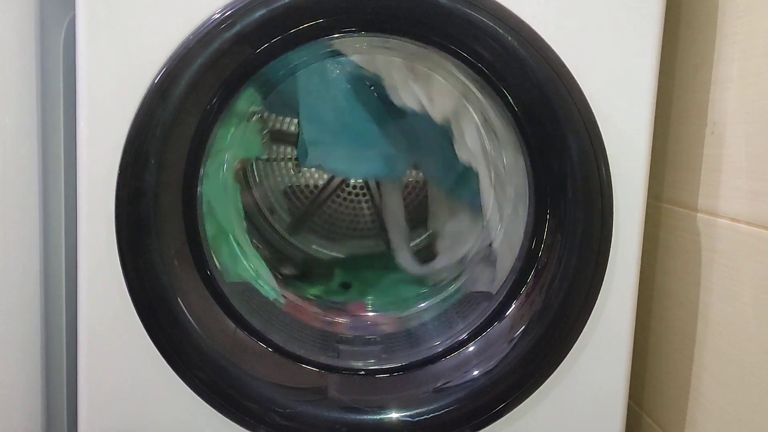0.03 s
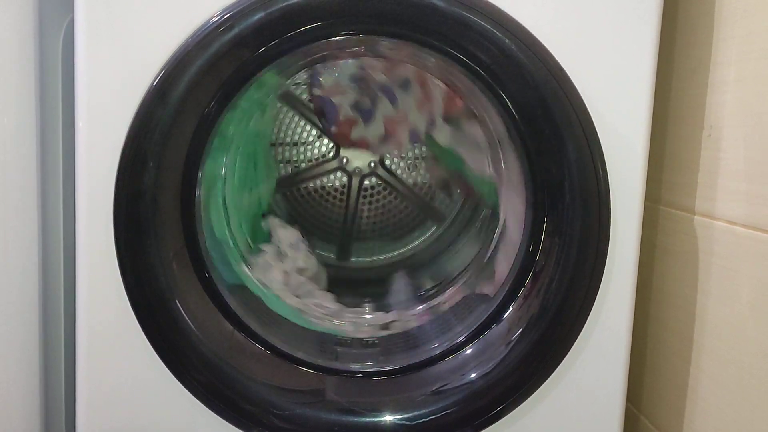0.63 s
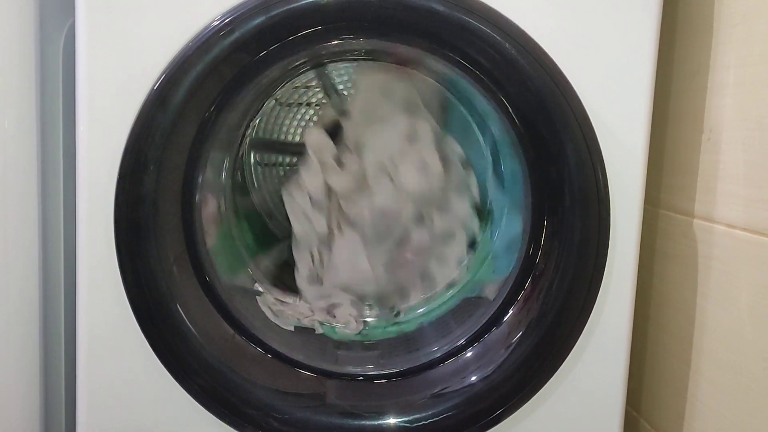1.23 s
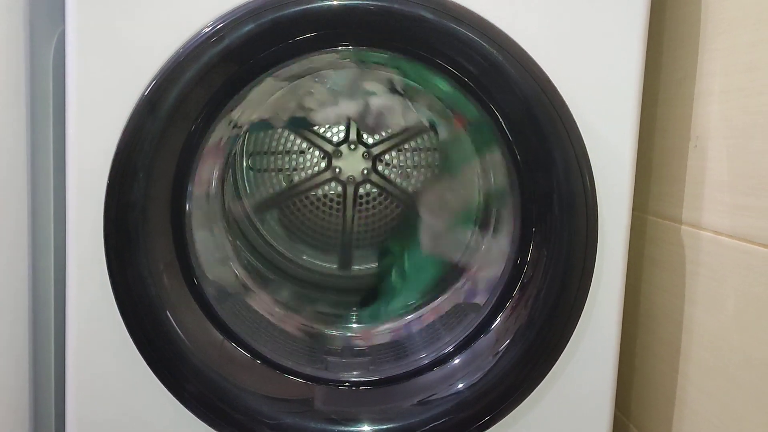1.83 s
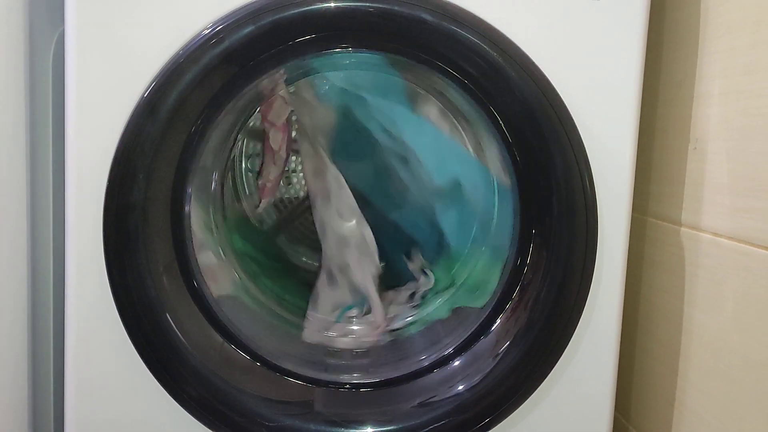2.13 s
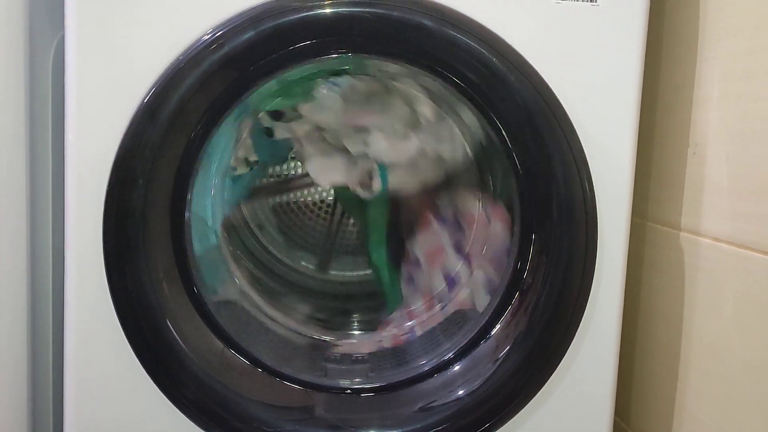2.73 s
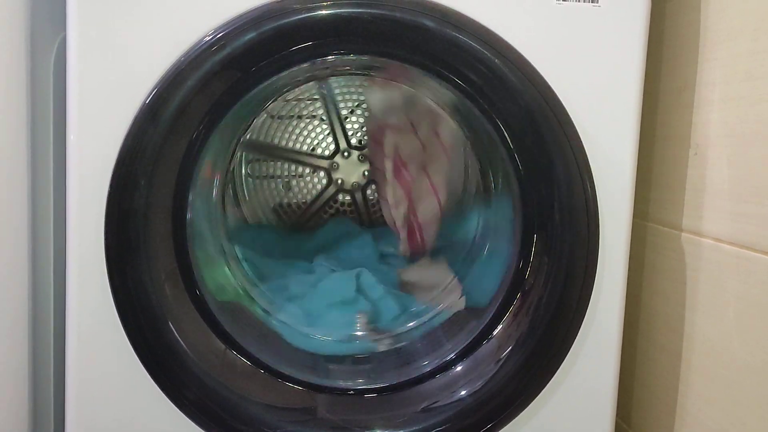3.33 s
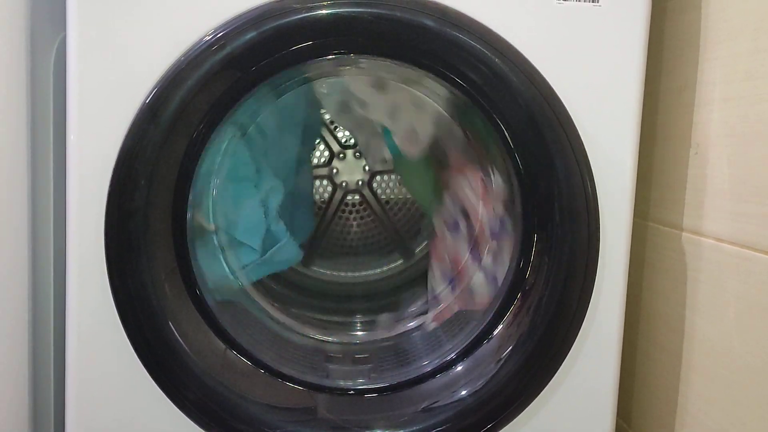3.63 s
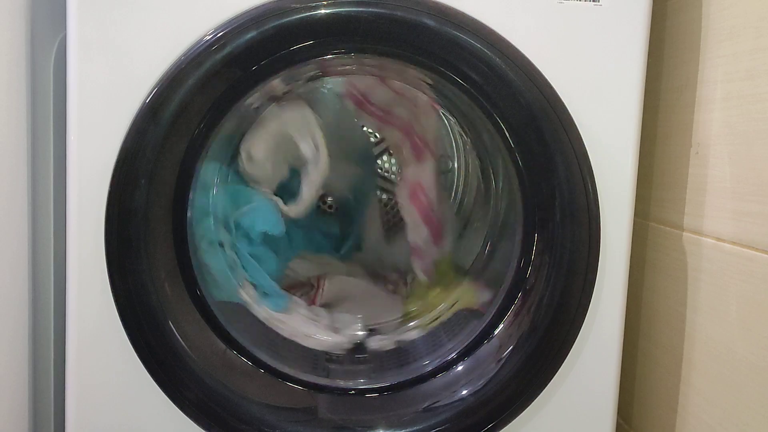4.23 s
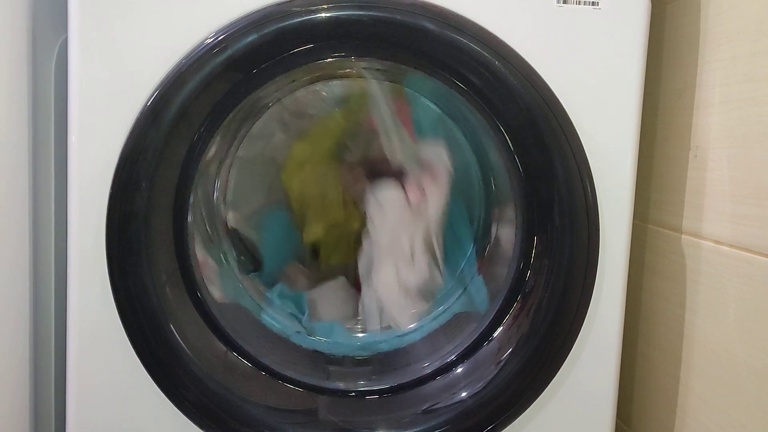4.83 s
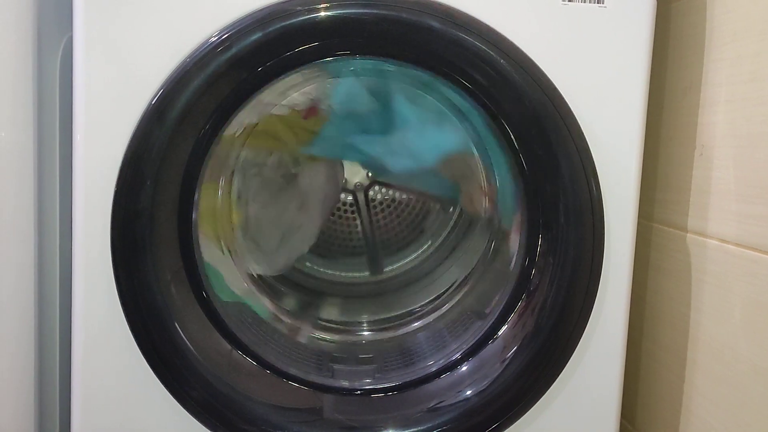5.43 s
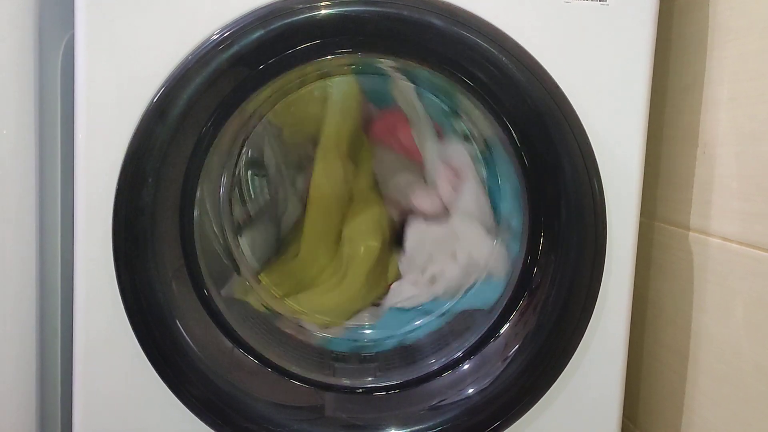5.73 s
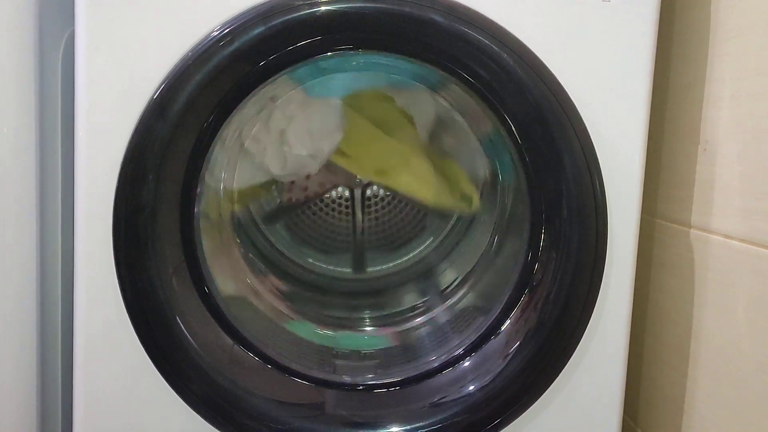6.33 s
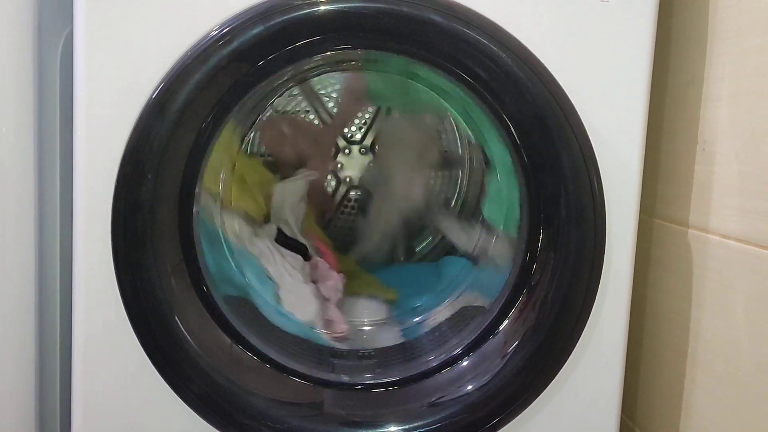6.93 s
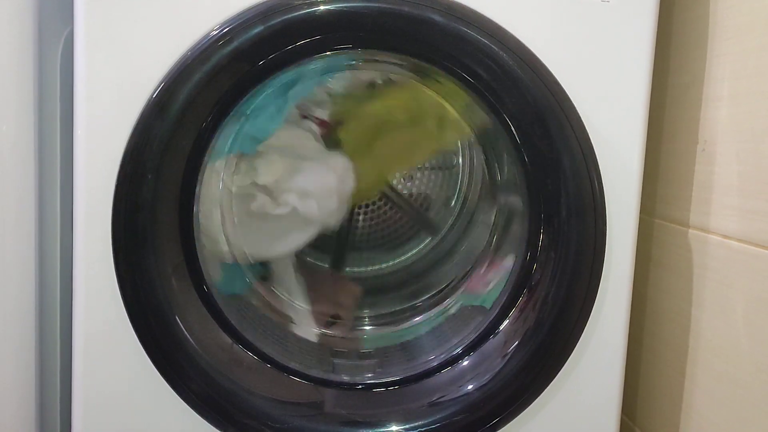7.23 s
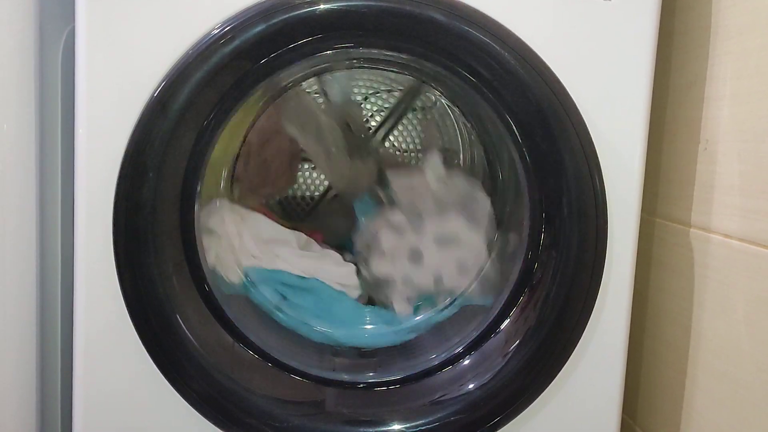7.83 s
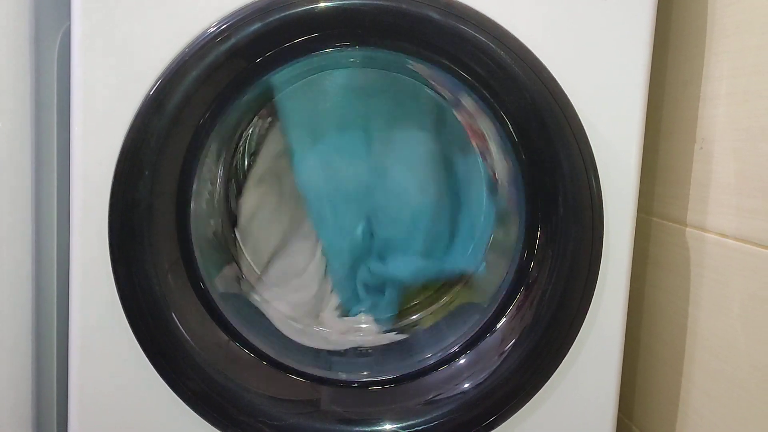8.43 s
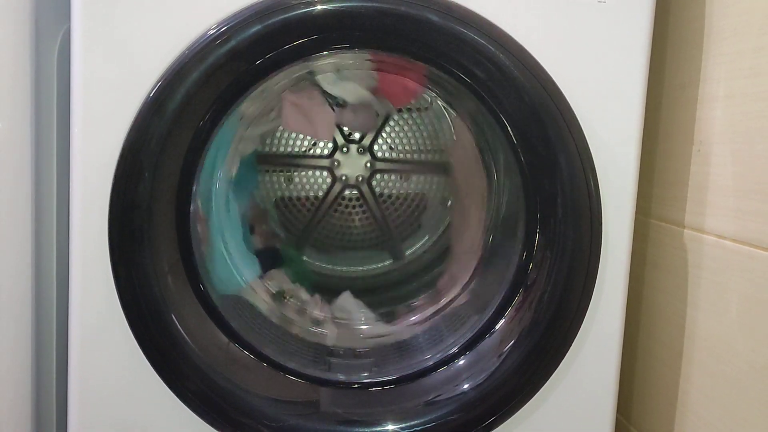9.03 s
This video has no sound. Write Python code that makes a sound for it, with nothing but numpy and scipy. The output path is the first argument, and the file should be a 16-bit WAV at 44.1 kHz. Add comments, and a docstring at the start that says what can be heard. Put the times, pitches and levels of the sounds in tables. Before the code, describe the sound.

A tumble dryer runs for the whole nine seconds or so, heard from just in front of its door in a small tiled room. The main sound is a steady low rumble and hum from the drum and cabinet, with air rushing evenly through the ducts, a thin high hiss and a very faint buzz. A quiet motor whine sags in pitch and recovers about once a second, starting near 0.7 seconds, as the drum lifts the load. Soft low thuds come irregularly throughout, a little stronger around 0.9, 2.8, 3.9 and 6 seconds. Cloth swishes and slaps gently on the steel, most clearly near 1.8, 2.8, 4.5, 7.1 and 8 seconds. Seams and buttons knock lightly on the drum, notably at about 2.9, 3.3, 4.7, 5.7, 6.2 and 7.4 seconds. The machine keeps the same pace to the end.

```python
"""Small tiled room, just in front of the door of a running tumble dryer.
Air moves through the ducts over a faint compressor buzz; the inverter hisses near 8 kHz.
About once a second the drum lifts the load: the motor's whine sags, then the laundry slides down.
The tumbling load makes the cabinet rumble, with brief low swells and soft thuds.
Cloth swishes and slaps on the steel; seams and buttons knock lightly."""
import sys
import numpy as np
from scipy import signal
from scipy.fft import rfft, irfft, next_fast_len
from scipy.io import wavfile
from scipy.ndimage import uniform_filter1d

SR = 44100
rng = np.random.default_rng(int(sys.argv[2]) if len(sys.argv) > 2 else 0)


def materialize(psi):
    """Save the field psi as 16-bit PCM at rate SR to the path in sys.argv[1].

    A 1-D psi becomes a single channel; in a 2-D psi each row is a channel.
    """
    bounded = np.clip(np.atleast_2d(psi).T, -1, 1)
    quanta = np.round(bounded * 32767).astype(np.int16)
    wavfile.write(sys.argv[1], SR, quanta)


N = 400869
TIME_S = np.arange(N) / SR
FFT_SIZE = next_fast_len(N)
FREQS_HZ = np.maximum(np.arange(FFT_SIZE // 2 + 1) * SR / FFT_SIZE, 1)
LEFT_RIGHT = np.array([[.5], [-.5]])  # splits a difference between the channels
WHINE_ORDER = 24  # whine cycles per shaft turn

# Room sound field. Each row: frequency in Hz, left-right correlation.
STEREO_CORRELATION = [(60, 0.98), (150, 0.99), (280, 0.92), (370, 0.71), (450, 0.046), (550, 0.78),
                      (680, 0.91), (850, 0.21), (980, 0.65), (1200, 0.28), (1550, -0.32), (2100, -0.15),
                      (7000, 0.22), (14000, 0.16)]
# Duct air spectrum. Each row: frequency in Hz, relative density in dB.
AIR_SPECTRUM = [(15, 10), (35, 0.5), (300, 0), (450, -6), (750, -6), (1100, -9), (2000, -19), (2400, -17.5),
                (2680, -22), (3330, -20), (3720, -22.5), (3950, -20.5), (4300, -22), (5400, -25),
                (6700, -20), (8700, -23.5), (9500, -32), (14000, -31)]
# Compressor shell resonances. Each row: centre in Hz, width in Hz, level in dB, left minus right in dB.
SHELL_MODES = [(2342, 40, -87, 0), (2750, 80, -86, 3), (2977, 50, -84.5, 5), (3300, 170, -88, -4),
               (3490, 100, -85, -8), (3900, 150, -89, 0), (4230, 90, -88, -4), (4690, 100, -89, -6),
               (4972, 50, -81.5, 9), (5100, 100, -88, -6), (5660, 200, -88, -9)]
# Inverter hiss peaks: the switching carrier near 8 kHz and its sidebands. Each row: centre in Hz, width in Hz,
# # relative level in dB, left minus right in dB.
HISS_PEAKS = [(6990, 250, -16.5, -3), (7220, 110, -9, -3), (7410, 290, -8.5, -5), (7650, 130, -2.5, -5),
              (7840, 190, -3.5, 4), (8016, 80, 2.6, -2.5), (8220, 250, -11.5, 3), (8380, 200, -13.5, 5),
              (8570, 70, -14, 5), (8740, 90, -18.5, 3)]
# Motor tones. Each row: multiple of shaft speed, relative level in dB, left minus right in dB,
# left phase lead in radians, gain in dB per percent of speed.
SHAFT_TONES = [(8, -2, -2, -0.4, 2.5), (12, -7.8, -6, -0.4, -1), (24, -1, -1.5, -0.5, 0),
               (25, -11.5, -5, -3.5, 0)]
# Motor casing resonance. Each row: whine frequency in Hz, gain in dB.
CASING_RESPONSE = [(1076, -9.5), (1083, -4), (1088, -.3), (1096, -1.8), (1106, -1.6), (1112, .6),
                   (1117, -3.5), (1124, -8.5)]
# Lifts of the load. Each row: heaviest point in seconds, whine sag in Hz, half length in seconds.
LOAD_LIFTS = [(0.72, 28, 0.19), (1.73, 34, 0.19), (2.71, 33, 0.21), (3.58, 29, 0.28), (4.43, 29, 0.27),
              (5.35, 37, 0.23), (6.22, 39, 0.26), (7.16, 41, 0.26), (8.13, 46, 0.27), (9.07, 43, 0.26)]
# Drum and cabinet modes. Each row: centre in Hz, width in Hz, relative level in dB.
CABINET_MODES = [(42.7, 13, -12.5), (59.5, 13, -2), (66, 20.3, -5.5), (88.7, 17.6, -7.5), (101.3, 2, -4),
                 (118.6, 16.7, -3.5), (136.2, 9.8, -3.5), (153, 9.2, -23.5), (170, 22.5, -15.5),
                 (199, 20.8, -8), (235.8, 21, -10), (265, 34, -14), (287.7, 16, -14), (313.3, 19.6, -14.5),
                 (350.4, 26, -20.5), (413, 45, -21.5), (480, 40, -22), (542, 82, -22), (594.5, 33, -17.5),
                 (663, 86, -17.5), (809, 19, -29), (849, 20, -31.5), (947, 72, -26.5), (1390, 250, -51),
                 (1720, 190, -46)]
# Drum rumble curve. Each row: time in seconds, level in dB.
RUMBLE_LEVELS = [(0, -42), (.9, -41.5), (1.4, -39.5), (2.15, -44), (2.48, -40.5), (3.1, -42), (3.55, -43),
                 (3.75, -40.5), (4.65, -43), (5.0, -40), (5.35, -45), (5.9, -40.5), (6.6, -42.5),
                 (7.3, -42), (7.8, -43), (8.3, -41), (8.7, -41), (9.09, -42.5)]
# Spectrum of cloth sliding on steel. Each row: frequency in Hz, relative density in dB.
CLOTH_SPECTRUM = [(600, -12), (1000, -5.5), (1300, 4), (1600, 3), (1880, 6.5), (2100, -1.5), (2600, -8),
                  (3500, -12.5), (6000, -32), (14000, -39)]
# Garments slapping the steel. Each row: start in seconds, rustle level in dB, decay in seconds,
# panel shudder level in dB.
GARMENT_SLAPS = [(.69, -61, .06, -56), (.76, -62, .09, -51), (1.835, -55.5, 0.13, -46),
                 (2.33, -59, .05, -58), (2.41, -60, .05, -58), (2.848, -49.5, 0.075, -43.5),
                 (2.925, -59, 0.071, -56), (3.48, -56, 0.039, -60), (3.87, -54.5, 0.064, -58),
                 (4.14, -58, 0.033, -50), (4.35, -59, .04, -60), (4.465, -54.5, 0.13, -48),
                 (4.515, -55.5, .06, -53), (4.595, -57, .05, -55), (4.652, -55, 0.049, -47.5),
                 (5.675, -54, 0.032, -51), (6.455, -61, 0.036, -46), (7.06, -53.5, 0.076, -53),
                 (7.2, -60, .04, -58), (7.41, -56, 0.04, -46), (7.979, -50, 0.03, -60),
                 (8.19, -60, .08, -62), (8.25, -57, .045, -47)]
# Sharp contacts on the drum: seams and buttons knocking, and the crisp onsets of garment slaps. Each row: start
# in seconds, peak in dB, pitch in Hz, # contact decay in seconds, Q.
DRUM_KNOCKS = [(.535, -47, 2750, .005, 1.4), (.692, -50, 2500, .005, 1.4), (1.882, -42, 830, .02, 1.8),
               (2.849, -43.5, 1900, .012, 3), (2.866, -35, 660, .011, 1.5), (3.310, -40, 850, .006, 1.1),
               (3.319, -41, 850, .02, 5), (4.346, -45, 1800, .012, 2.2), (4.513, -42, 780, .025, 1.2),
               (4.652, -38.5, 1400, .012, 1.6), (4.678, -42, 1350, .01, 1.8), (4.97, -44.5, 850, .012, 8),
               (5.36, -46, 850, .012, 8), (5.676, -39, 1600, .007, 1.5), (5.70, -42, 950, .012, 1.4),
               (6.198, -34, 820, .006, 1.2), (6.455, -40, 620, .02, 2), (7.15, -43, 780, .015, 2.5),
               (7.197, -42.5, 1800, .012, 2.2), (7.409, -45, 2400, .005, 1.5),
               (7.983, -41.5, 2300, .005, 1.6), (7.994, -42, 1850, .009, 2.4),
               (7.404, -40, 855, .024, 18)]
# Brief low swells and soft thuds in the drum's rumble. Each row: start in seconds, level in dB,
# pitch in Hz, swell in seconds.
RUMBLE_PULSES = [(.310, -36, 104, .007), (.637, -36, 109, 0.0078), (.783, -32.5, 86, .007),
                 (.863, -36.5, 204, 0.013), (.902, -27, 106, 0.0053), (.960, -35, 74, 0.0054),
                 (1.211, -35, 105, 0.0075), (1.289, -41, 226, 0.008), (1.338, -32, 84, 0.0065),
                 (1.496, -37, 85, .007), (2.027, -40, 221, .009), (2.440, -38, 76, .013),
                 (2.834, -31.5, 106, .011), (2.942, -35, 106, .006), (3.631, -32, 93, 0.0088),
                 (3.913, -29.5, 123, 0.0062), (4.575, -38, 210, .009), (4.823, -33.5, 91, .008),
                 (4.961, -33, 91, 0.0062), (5.513, -34, 77.5, .008), (5.950, -31.5, 93, 0.0062),
                 (6.195, -41, 225, 0.01), (6.64, -40, 230, .011), (6.778, -35, 113, 0.0088),
                 (7.354, -32, 114, .009), (7.773, -31.5, 63.5, 0.018), (8.043, -33.5, 71.4, .008),
                 (8.595, -32.5, 75, 0.01), (8.829, -35, 72, .016)]


def from_db(db):
    """Decibels to gain."""
    return 10 ** (np.asarray(db) / 20)


def unit_rms(x):
    """Scale to rms 1."""
    return x / np.sqrt(np.mean(x ** 2) + 1e-20)


def over_freqs(table):
    """A table read at every FFT bin, on a log frequency axis."""
    hz, value = np.transpose(table)
    return np.interp(np.log(FREQS_HZ), np.log(hz), value)


def pan(left_minus_right_db):
    """Left and right gains."""
    return from_db(LEFT_RIGHT * left_minus_right_db)


def resonance(hz, centre_hz, width_hz):
    """Complex response of one mode, 1 at its centre."""
    return 1 / (1 + 1j * (hz ** 2 - centre_hz ** 2) / (hz * width_hz))


def steep_peaks(hz, modes):
    """Left and right gains of steep-sided resonances, summed in power."""
    gains = (from_db(db) * pan(pan_db) * abs(resonance(hz, centre_hz, width_hz)) ** 2
             for centre_hz, width_hz, db, pan_db in modes)
    return np.sqrt(sum(gain ** 2 for gain in gains))


def drift(rate_hz):
    """Random wander, mostly slower than rate_hz; rms 1."""
    spectrum = rfft(rng.standard_normal(FFT_SIZE)) / (1 + (FREQS_HZ / rate_hz) ** 2)
    return unit_rms(irfft(spectrum, FFT_SIZE)[:N])


def stereo_noise(gain, left_lag_s=.00009):
    """Coloured noise, alike on both sides in the bass, diffuse in the treble; rms 1."""
    mid, side = rfft(rng.standard_normal((2, FFT_SIZE)))
    correlation = np.clip(over_freqs(STEREO_CORRELATION), -1, 1)
    spectrum = np.sqrt(1 + correlation) * mid + np.sqrt(1 - correlation) * side * [[1], [-1]]
    delay = np.exp(-2j * np.pi * FREQS_HZ * np.array([[left_lag_s], [0]]))
    return unit_rms(irfft(gain * delay * spectrum, FFT_SIZE)[:, :N])


def levelled(noise, span_s):
    """Flatten a noise's own slow swells."""
    power = uniform_filter1d(np.mean(noise ** 2, axis=0), int(span_s * SR))
    return noise / np.sqrt(power + 1e-9)


def add(out, start_s, sound):
    """Mix a short sound in at start_s."""
    start = int(start_s * SR)
    out[:, start:start + sound.shape[1]] += sound[:, :N - start]


def lifting(lag_s):
    """Lifting effort (a round-topped 0-to-1 bump per lift) and whine sag in Hz, delayed by lag_s."""
    bumps = np.array([np.exp(-abs((TIME_S - lag_s - peak_s) / half_s) ** 3)
                      for peak_s, _, half_s in LOAD_LIFTS])
    return bumps.sum(axis=0), np.array(LOAD_LIFTS)[:, 1] @ bumps


def duct_air(level_db=-50):
    """Air moving through the ducts: steady broad noise."""
    return from_db(level_db) * stereo_noise(from_db(over_freqs(AIR_SPECTRUM))) * pan(-1.2)


def compressor(cycle_hz=48.8):
    """Steady buzz: one repeated cycle, its high harmonics picked out by the shell."""
    size = 4096
    harmonics_hz = cycle_hz * np.maximum(np.arange(size // 2 + 1), 1)
    phasors = np.exp(2j * np.pi * rng.random((2, len(harmonics_hz))))
    cycle = irfft(steep_peaks(harmonics_hz, SHELL_MODES) * phasors) * size / np.sqrt(2)
    position = np.arange(size) / size
    return np.array([np.interp(TIME_S * cycle_hz, position, channel, period=1) for channel in cycle])


def wall_phase(step_hz, spread_rad, lead_rad):
    """The left side leads in phase; reflections scatter the lead across frequency."""
    steps = 1000
    leads_rad = lead_rad + spread_rad * rng.standard_normal(steps)
    return np.exp(1j * np.interp(FREQS_HZ / step_hz, np.arange(steps), leads_rad) * LEFT_RIGHT)


def inverter(shaft_turns, level_db=-54, dip_db=1.7, smooth_s=.4, poles=8, diffuse_share=.4):
    """Switching hash peaks around its carrier near 8 kHz, pulses as poles pass and dips just after each lift."""
    effort, _ = lifting(lag_s=.14)
    gain = from_db(level_db - dip_db * uniform_filter1d(effort, int(smooth_s * SR)))
    pole_rad = 2 * np.pi * poles * shaft_turns
    pulsing = 1 + .062 * np.sin(pole_rad) + .055 * np.sin(pole_rad / 2)
    early = rfft(rng.standard_normal(FFT_SIZE)) * wall_phase(step_hz=12, spread_rad=.8, lead_rad=1.7)
    diffuse = rfft(rng.standard_normal((2, FFT_SIZE)))
    spectrum = np.sqrt(1 - diffuse_share) * early + np.sqrt(diffuse_share) * diffuse
    hiss = irfft(spectrum * steep_peaks(FREQS_HZ, HISS_PEAKS), FFT_SIZE)[:, :N]
    return gain * pulsing * unit_rms(hiss) * pan(-.28)


def motor(shaft_turns, whine_hz, base_db=-55, fade_db_per_s=.03, flutter_db=1.5, flutter_hz=45):
    """Shaft-locked tones; the whine swells and fades as speed carries it across a casing resonance."""
    speed_offset_percent = 100 * (whine_hz / whine_hz.mean() - 1)
    motor_db = base_db - fade_db_per_s * TIME_S
    casing = from_db(np.interp(whine_hz, *np.transpose(CASING_RESPONSE)))
    out = np.zeros((2, N))
    for order, tone_db, pan_db, lead_rad, db_per_percent in SHAFT_TONES:
        flutter = drift(flutter_hz) + LEFT_RIGHT * drift(flutter_hz)
        jitter_rad = .19 * drift(rate_hz=16)
        phase_rad = 2 * np.pi * order * shaft_turns + np.array([[lead_rad], [0]]) + jitter_rad
        gain = from_db(motor_db + tone_db + db_per_percent * speed_offset_percent + flutter_db * flutter)
        if order == WHINE_ORDER:
            gain *= casing
        out += gain * pan(pan_db) * np.sqrt(2) * np.sin(phase_rad)
    return out


def cabinet_noise(low_hz, high_hz):
    """Cabinet modes in one range, kept ringing by countless small contacts; rms 1."""
    gains = (from_db(db) * abs(resonance(FREQS_HZ, centre_hz, width_hz)) ** 2
             for centre_hz, width_hz, db in CABINET_MODES if low_hz <= centre_hz < high_hz)
    return stereo_noise(np.sqrt(sum(gain ** 2 for gain in gains)))


def drum(sliding, walls_db=-47, panels_db=-54, swell_db=1, flicker_db=1):
    """The turning load shakes the whole cabinet low down, side walls above that, thin panels on top."""
    body = levelled(cabinet_noise(0, 163), span_s=.086)
    walls = levelled(cabinet_noise(163, 385), span_s=.36) * pan(-.6)
    panels = levelled(cabinet_noise(385, 1200), span_s=.13) * pan(-1.1)
    rattle_db = panels_db + swell_db * sliding + flicker_db * drift(rate_hz=2.8)
    rumble_db = np.interp(TIME_S, *np.transpose(RUMBLE_LEVELS)) + flicker_db * drift(rate_hz=7.4)
    return from_db(rumble_db) * body + from_db(walls_db) * walls + from_db(rattle_db) * panels


def cloth(sliding, swish_db=-62, swell_db=1, flicker_db=1.5, crinkle_db=2.5, attack_s=.0091):
    """Cloth swishes on steel, slightly more after each lift; garments slap it and shake the panels."""
    rustle_power = from_db(swish_db + swell_db * sliding) ** 2
    shudder_power = 0
    crinkle = unit_rms(from_db(crinkle_db * drift(rate_hz=90)))  # folds catch and let go
    for start_s, rustle_db, decay_s, shudder_db in GARMENT_SLAPS:
        age_s = np.maximum(TIME_S - start_s, 0)
        decay = np.exp(-np.clip((age_s - attack_s) / decay_s, 0, 20))
        envelope = np.minimum(age_s / attack_s, 1) * decay
        rustle_power += (from_db(rustle_db) * envelope * crinkle) ** 2
        shudder_power += (from_db(shudder_db) * envelope) ** 2
    flicker = from_db(flicker_db * drift(rate_hz=16))
    friction = stereo_noise(from_db(over_freqs(CLOTH_SPECTRUM))) * pan(3.7)
    rustle = np.sqrt(rustle_power) * flicker * friction
    shudder = np.sqrt(shudder_power) * cabinet_noise(250, 1200)
    return rustle + shudder


def knock(pitch_hz, decay_s, q, echo_db=-14, echo_decay_s=.017):
    """One contact: a dying scuff and its scatter round the drum ring the modes near pitch_hz; peak 1."""
    size = 16384
    age_s = np.arange(size) / SR
    hz = np.maximum(np.arange(size // 2 + 1) * SR / size, 1)
    body = sum(from_db(db) * rng.choice([-1, 1]) * resonance(hz, centre_hz, width_hz)
               for centre_hz, width_hz, db in CABINET_MODES)
    envelope = np.hypot(np.exp(-age_s / decay_s), from_db(echo_db) * np.exp(-age_s / echo_decay_s))
    mid, side = rfft(rng.standard_normal((2, size)) * envelope)
    correlation = np.clip(np.interp(pitch_hz, *np.transpose(STEREO_CORRELATION)), -1, 1)
    force = (1 + correlation) * mid + (1 - correlation) * side * [[1], [-1]]
    out = irfft(force * body * resonance(hz, pitch_hz, pitch_hz / q) ** 2)
    return out / abs(out).max()


def rumble_pulse(pitch_hz, swell_s, ring_db=-11):
    """A low tone swells and dies within a few cycles, over a short ring of the cabinet modes."""
    ring = knock(pitch_hz, decay_s=.0072, q=1.16)
    age_s = np.arange(ring.shape[1]) / SR
    envelope = age_s / swell_s * np.exp(1 - age_s / swell_s)
    tone = envelope * np.sin(2 * np.pi * pitch_hz * age_s)
    return tone + from_db(ring_db) * ring


def laundry(sliding):
    """Cloth slides, the rumble swells briefly, seams and buttons strike the drum."""
    out = cloth(sliding)
    for start_s, level_db, pitch_hz, swell_s in RUMBLE_PULSES:
        add(out, start_s, from_db(level_db) * rumble_pulse(pitch_hz, swell_s))
    for start_s, peak_db, pitch_hz, decay_s, q in DRUM_KNOCKS:
        add(out, start_s, from_db(peak_db) * knock(pitch_hz, decay_s, q))
    return out


def scene():
    """Air, drive, drum and load; each lift slows the motor, then sets the laundry sliding."""
    free_whine_hz, rise_hz_per_s, jostle_hz = 1111, 1.6, 1.4
    _, sag_hz = lifting(lag_s=0)
    sliding, _ = lifting(lag_s=.32)
    wobble_hz = jostle_hz * drift(rate_hz=8)  # the shifting load unsettles the pitch
    whine_hz = free_whine_hz + rise_hz_per_s * TIME_S - sag_hz + wobble_hz
    shaft_turns = np.cumsum(whine_hz / WHINE_ORDER) / SR
    drive = motor(shaft_turns, whine_hz) + inverter(shaft_turns)
    return duct_air() + drive + drum(sliding) + laundry(sliding) + compressor()


def record(dry):
    """The microphone drops the deepest bass; the top is cut steeply."""
    low_cut_hz, high_cut_hz = 16, 14260
    highpass = signal.butter(2, low_cut_hz, "high", fs=SR, output="sos")
    lowpass = signal.ellip(12, .1, 80, high_cut_hz, fs=SR, output="sos")
    return signal.sosfilt(lowpass, signal.sosfilt(highpass, dry))


dry = scene()
out = record(dry)
materialize(out)
```